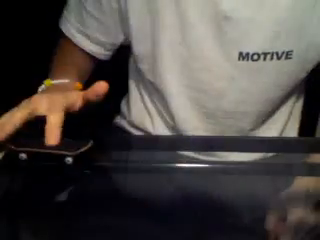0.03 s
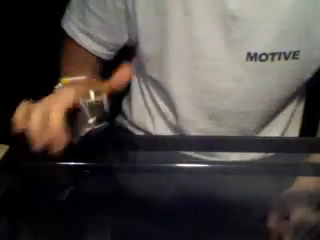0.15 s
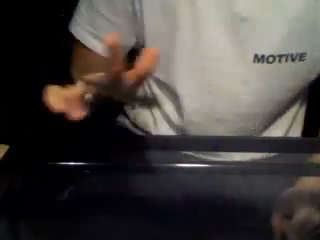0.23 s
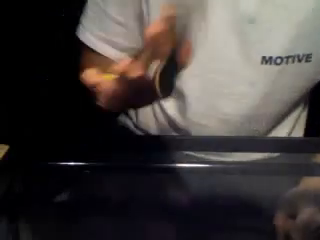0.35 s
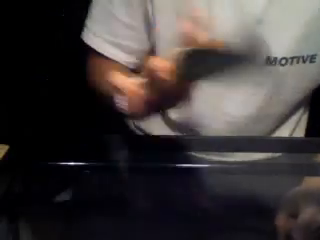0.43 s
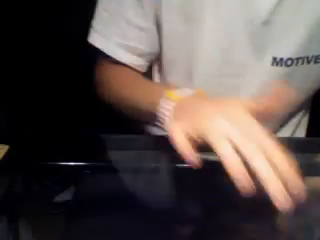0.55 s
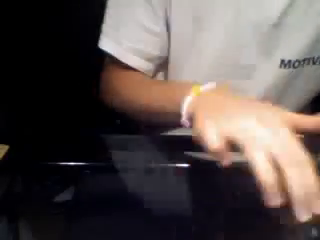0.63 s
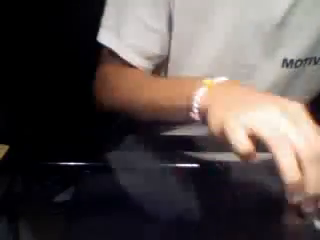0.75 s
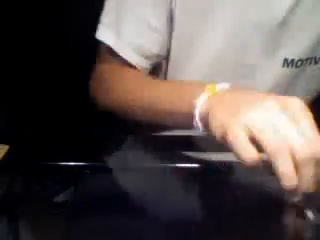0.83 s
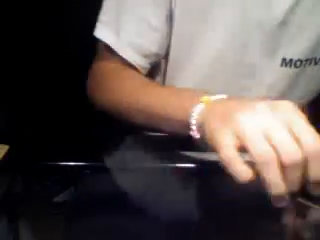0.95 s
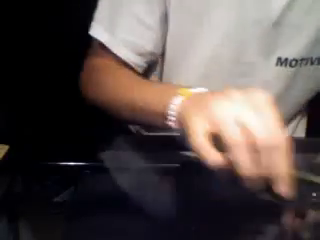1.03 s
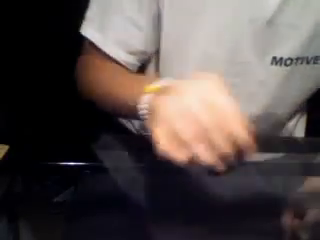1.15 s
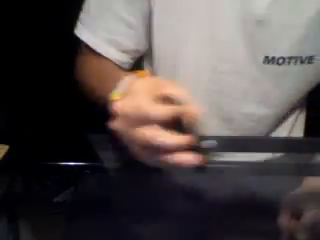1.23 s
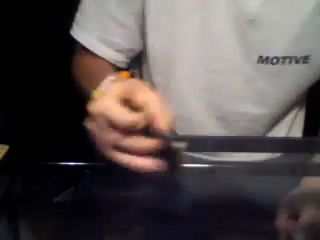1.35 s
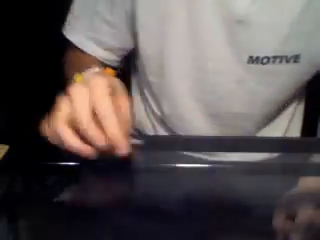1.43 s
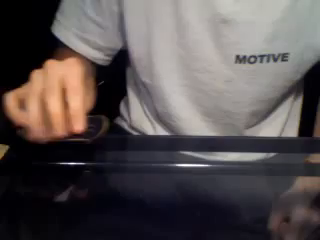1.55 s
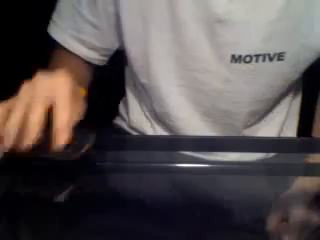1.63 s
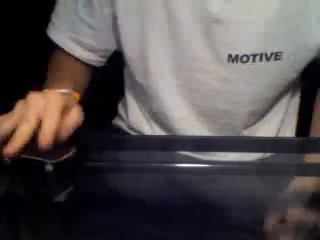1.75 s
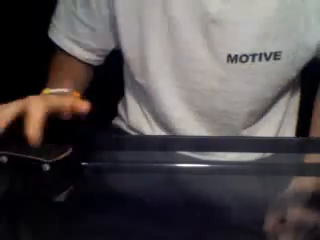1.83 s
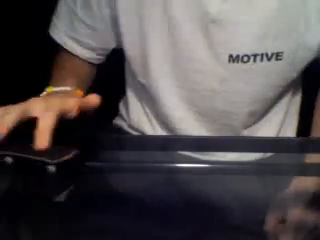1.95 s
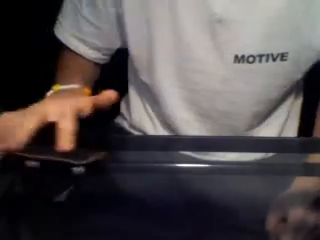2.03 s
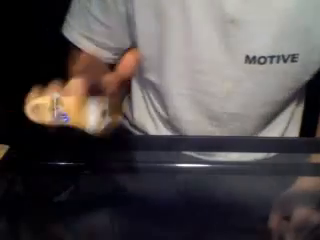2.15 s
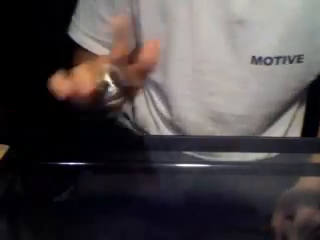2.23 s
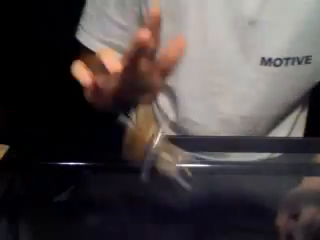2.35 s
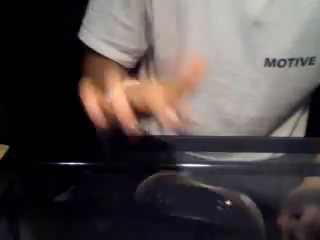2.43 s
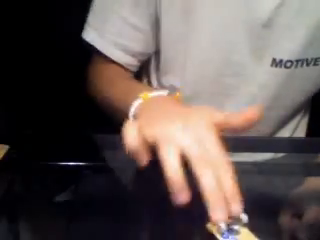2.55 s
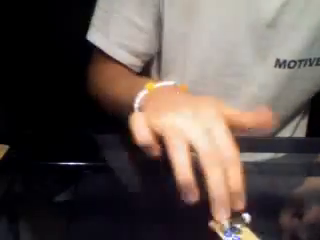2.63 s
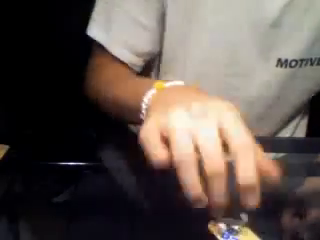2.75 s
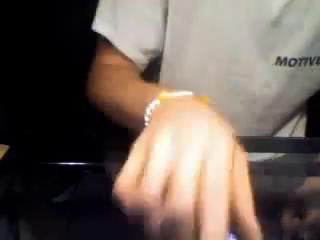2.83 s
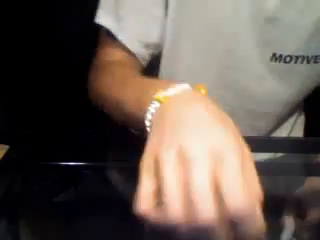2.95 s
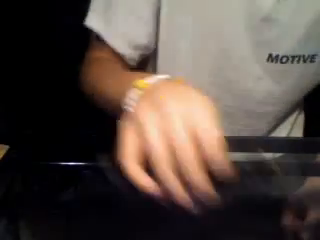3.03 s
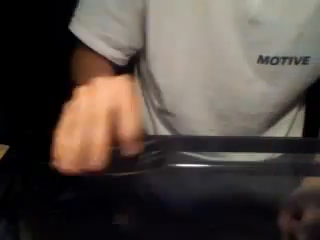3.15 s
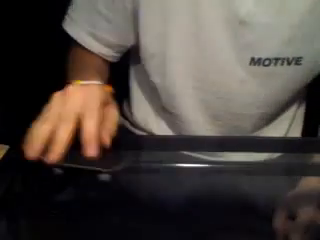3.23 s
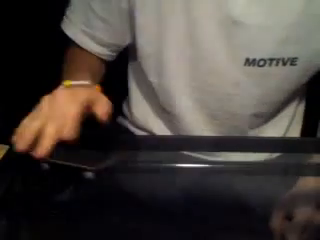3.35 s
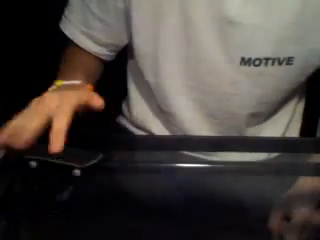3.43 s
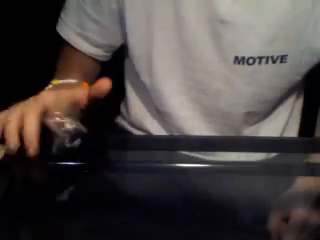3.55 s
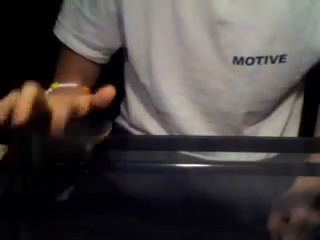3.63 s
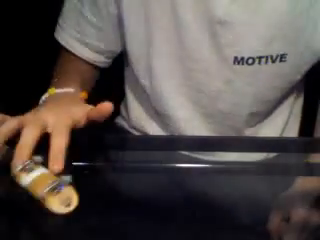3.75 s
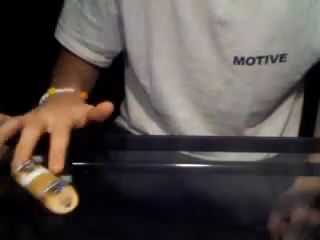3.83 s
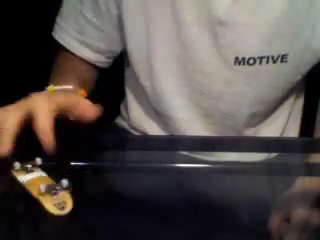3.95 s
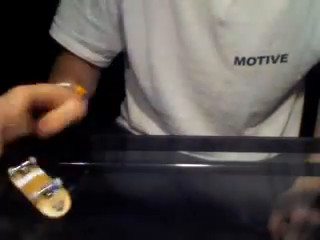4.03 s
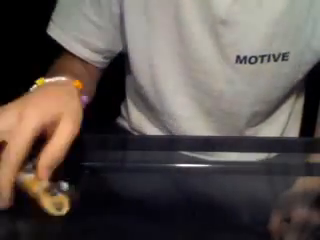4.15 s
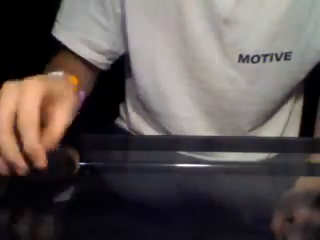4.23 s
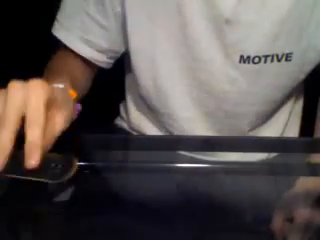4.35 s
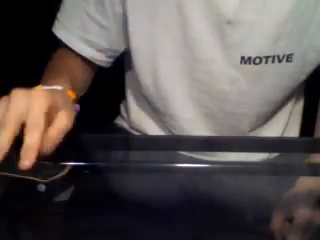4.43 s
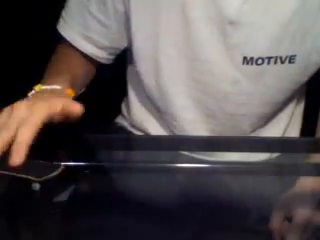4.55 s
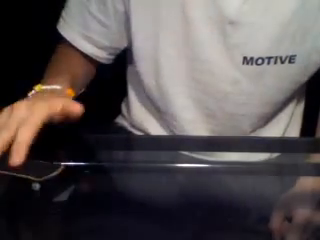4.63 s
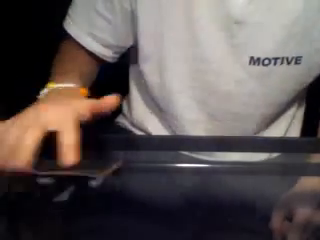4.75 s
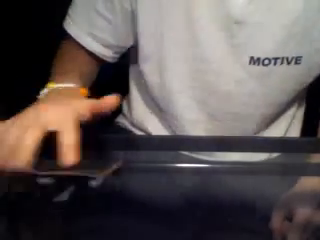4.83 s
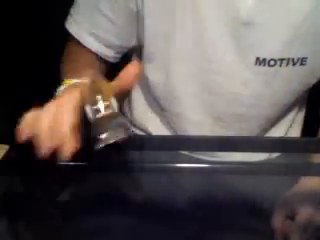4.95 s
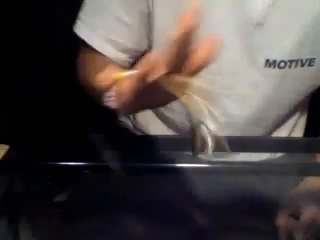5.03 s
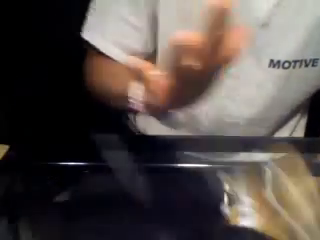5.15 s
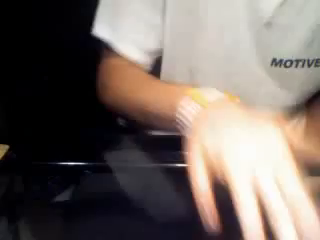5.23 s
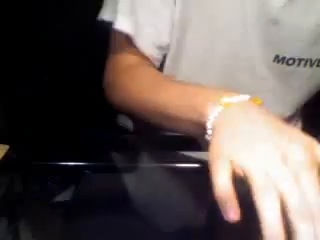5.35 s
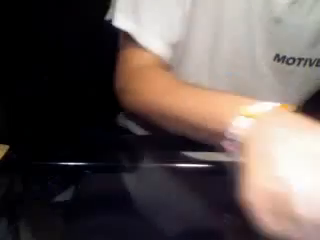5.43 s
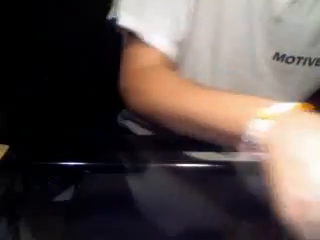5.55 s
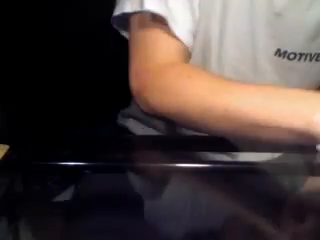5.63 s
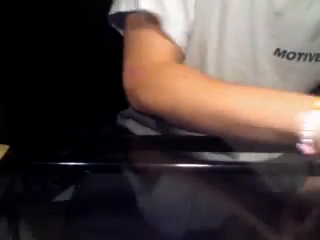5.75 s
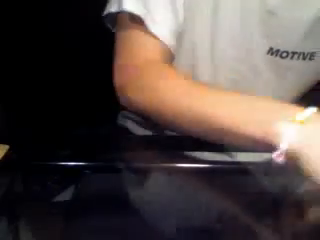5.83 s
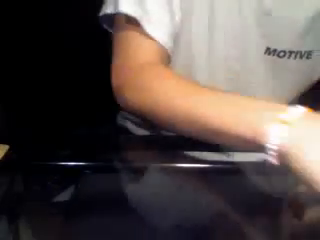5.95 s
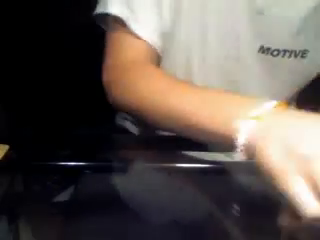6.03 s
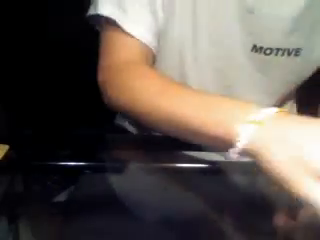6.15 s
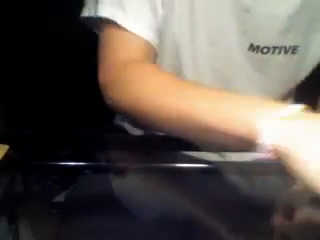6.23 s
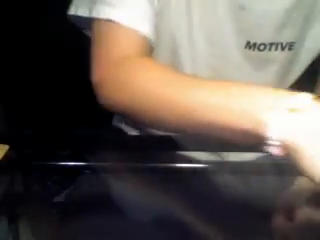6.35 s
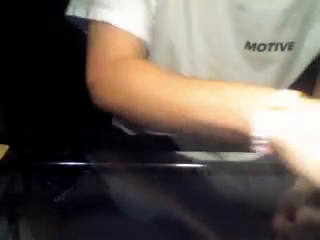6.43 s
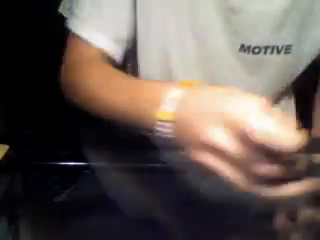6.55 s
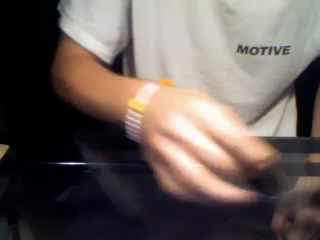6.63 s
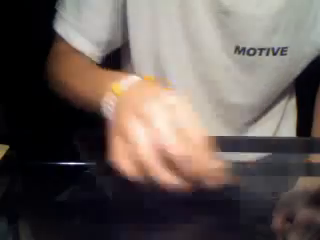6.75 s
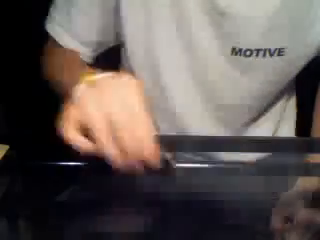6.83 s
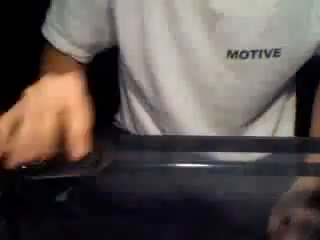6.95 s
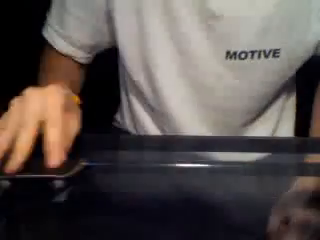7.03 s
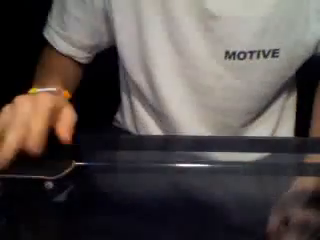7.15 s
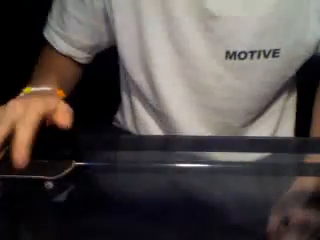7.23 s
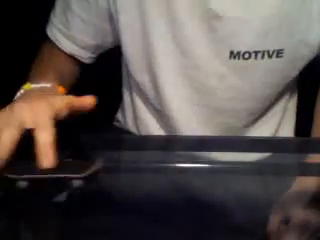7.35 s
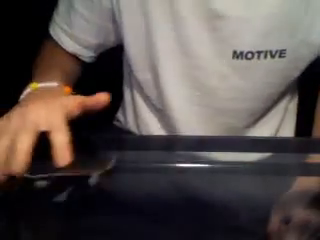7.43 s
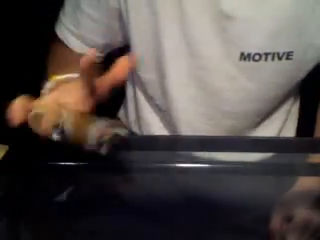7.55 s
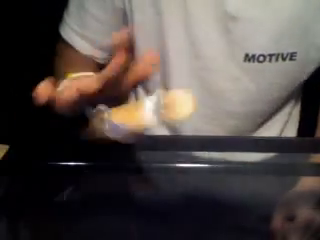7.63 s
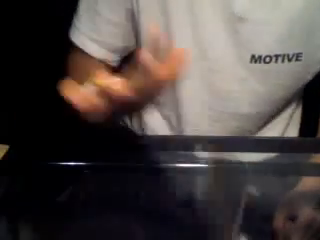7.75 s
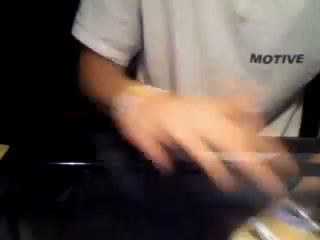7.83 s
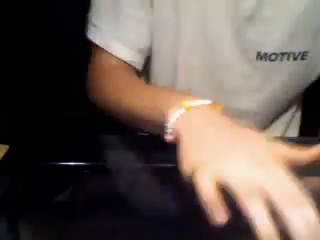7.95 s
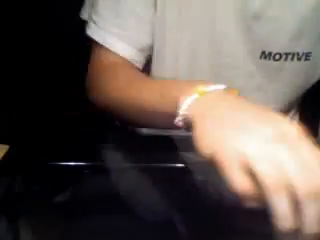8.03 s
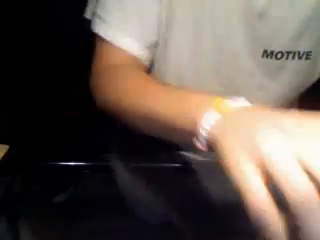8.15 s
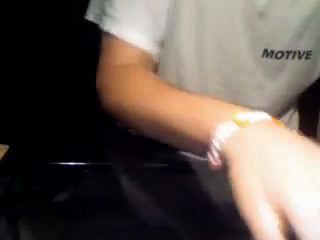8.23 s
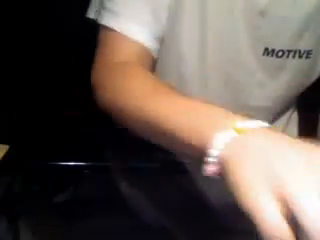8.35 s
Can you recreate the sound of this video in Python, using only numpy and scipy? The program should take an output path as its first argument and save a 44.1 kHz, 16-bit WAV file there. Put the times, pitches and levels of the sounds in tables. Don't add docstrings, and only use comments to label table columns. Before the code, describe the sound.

A miniature wooden skateboard snaps, flips and clatters on a glass table, sharp clicks and clacks between short rolling rumbles over a steady fan whine.

```python
import sys
import numpy as np
from scipy import signal
from scipy.fft import rfft, irfft
from scipy.io import wavfile
from scipy.ndimage import uniform_filter1d

SR = 44100
rng = np.random.default_rng(int(sys.argv[2]) if len(sys.argv) > 2 else 0)


def ratio_of_db(decibels):
    return 10 ** (np.asarray(decibels, float) / 20)


def transcribe(signal):
    frames = np.atleast_2d(signal).T
    limited = np.clip(frames, -1, 1)
    pcm = np.round(limited * 32767).astype(np.int16)
    wavfile.write(sys.argv[1], SR, pcm)


N = 369999


def rms_one(x):
    return x / np.sqrt(np.mean(x ** 2) + 1e-20)


def filtered(x, order, edge_hz, kind):
    return signal.sosfilt(signal.butter(order, edge_hz, kind, fs=SR, output="sos"), x)


def drift(rate_hz):
    pole = np.exp(-80 * np.pi * rate_hz / SR)
    slow = signal.lfilter([1], [1, -2 * pole, pole * pole], rng.standard_normal(N // 40 + 2002))[2000:]
    return np.interp(np.arange(N) / 40, np.arange(len(slow)), rms_one(slow - slow.mean()))


def sparse_grit(rate_hz):
    return (rng.random(N) < rate_hz / SR) * rng.standard_normal(N)


def ring(clicks, hz, t60_s):
    pole, w = ratio_of_db(-60 / (t60_s * SR)), 2 * np.pi * hz / SR
    return signal.lfilter([0, np.sin(w)], [1, -2 * pole * np.cos(w), pole * pole], clicks + 1e-18)


def resonance(x, hz, width_hz):
    pole = np.exp(-np.pi * width_hz / SR)
    feedback = [1, -2 * pole * np.cos(2 * np.pi * hz / SR), pole * pole]
    return signal.lfilter([(1 - pole * pole) / 2, 0, (pole * pole - 1) / 2], feedback, x)


def strike(modes, times_s, level_db, bursts, spread_db):
    delay_s = 0.0006
    starts = np.round((times_s + delay_s) * SR).astype(int)
    out, size = np.zeros((bursts.shape[1], N)), bursts.shape[2]
    luck = rng.standard_normal((len(times_s), len(modes)))
    for k, (hz, db, t60_s) in enumerate(modes):
        gains = ratio_of_db(level_db + db + spread_db * luck[:, k])
        force = np.zeros((len(out), N + size))
        for at, gain, burst in zip(starts, gains, bursts):
            force[:, at:at + size] += gain * burst
        out += (-1) ** k * ring(force[:, :N], hz, t60_s)
    return out


def damped(modes):
    return [(hz, db, min(t60_s, 17 / hz)) for hz, db, t60_s in modes]


# start_s, peak_db, metal_db, thud_db, drag_db
POPS = [
    (0.165, -19.5, -4, -37, -43.5),
    (2.129, -18.5, -2, -33, -45),
    (3.584, -22, 0.5, -41, -56),
    (4.846, -21, -3, -40.5, -42.5),
    (7.514, -19, -5.5, -39, -48.5),
]
# start_s, peak_db, wood_db, metal_db, thud_db
RATTLES = [(0.565, -4.5, -21.5, -13, -54), (0.574, -12.5, -14.5, -13, -42), (0.962, -17, -21, -17, -32),
           (1.424, -6.5, -15.5, -19.5, -30.5), (1.435, -10.5, -21, -19.5, -37.5),
           (1.674, -19.5, -19, -15, -50), (2.417, -8, -17, -11, -21.5), (2.517, -11, -25, -8, -25),
           (3.001, -19, -23, -13, -41.5), (3.226, -35, -4, -8, -51), (3.265, -17.5, -20, -19.5, -47.5),
           (3.729, -12, -16.5, -12, -41.5), (4.25, -16.5, -21.5, -12.5, -48),
           (4.386, -31, -10.5, -10, -45.5), (4.437, -16, -14.5, -17.5, -41.5),
           (5.328, -23.5, -14.5, -16.5, -39.5), (5.447, -24, -19, -12.5, -43),
           (6.756, -5.5, -19, -14.5, -33), (7.023, -27.5, -12.5, -8, -48),
           (7.052, -18.5, -16, -16.5, -43.5), (7.817, -5, -16.5, -16.5, -29),
           (7.899, -14.5, -25.5, -13.5, -30.5), (7.971, -23.5, -8.5, -8, -33),
           (8.311, -14, -17, -14, -29.5)]
# start_s, peak_db, wood_db, metal_db, thud_db
CLACKS = [(0.545, -3, -15.5, -15.5, -23.5), (0.567, -5.5, -21, -33, -24), (0.597, -12.5, -14, -6, -24.5),
          (0.627, -10, -25.5, -15, -29), (0.635, -10, -33, -28, -57), (1.706, -14, -21, -18.5, -41.5),
          (2.51, -9.5, -13.5, -9.5, -22), (3.205, -24.5, -10, -11, -41.5), (3.755, -14, -14.5, -18, -34.5),
          (3.787, -16.5, -22, -35, -47), (3.813, -24, -18.5, -12.5, -41), (3.843, -24, -26, -22.5, -42),
          (5.153, -10.5, -22.5, -11, -22), (5.176, -4.5, -18, -14, -22), (5.186, -7, -39, -16, -36),
          (5.246, -4.5, -18, -24.5, -22), (5.252, -13, -10, -8, -49), (5.261, -10, -30, -26.5, -33),
          (5.364, -30.5, -2.5, -8.5, -35.5), (7.012, -20.5, -9, -17.5, -49), (7.799, -6, -13, -20.5, -25),
          (7.887, -15.5, -22.5, -17, -25.5), (7.985, -23, -19, -10.5, -52), (8.048, -14.5, -25, -25, -50)]
# start_s, peak_db, wood_db, thud_db
TAPS = [(0.585, -18.5, -18, -39), (0.776, -34.5, -11, -72), (1.343, -28, -4.5, -47.5),
        (2.97, -31, -12.5, -44.5), (3.433, -41.5, -18.5, -56.5), (3.855, -29, -16.5, -60.5),
        (4.221, -40.5, -4.5, -51.5), (4.45, -28, -15.5, -49), (4.586, -42, -7.5, -79),
        (5.384, -23, -7.5, -52), (5.406, -19.5, -11, -33), (5.525, -25.5, -11, -39),
        (6.375, -24.5, -17.5, -46), (6.4, -20, -9, -37.5), (6.674, -20.5, -3.5, -35),
        (6.765, -20, -19, -57.5), (6.775, -20.5, -23, -55.5), (7.916, -27, -27.5, -44),
        (7.996, -25.5, -10.5, -44)]
# start_s, peak_db
TICKS = [
    (4.09, -52),
    (5.424, -48),
    (5.572, -46.5),
    (8.015, -47),
]


def contacts():
    rows = []
    for s, db, metal, thud, _ in POPS:
        for lag_s, loss_db in [(0, 0), (0.013, -34)]:
            rows.append((s + lag_s, db + loss_db, -14.5, metal, metal - 3, thud, 2.2))
    rest = [(*row, 6.0) for row in RATTLES] + [(*row, 3.0) for row in CLACKS]
    rest += [(s, db, wood, -26, thud, 3.6) for s, db, wood, thud in TAPS]
    rest += [(s, db, -28, -4, -77, 3.0) for s, db in TICKS]
    rows += [(s, db, wood, metal, metal, thud, ms) for s, db, wood, metal, thud, ms in rest]
    return np.transpose(rows)


# pitch_hz, level_db, t60_s
DECK = [(607.6, -3, 0.038), (778, -2, 0.06), (998, -2.5, 0.053), (1095, -1, 0.045), (1324, 8.5, 0.0049),
        (1577, 1.5, 0.036), (1867, -1, 0.036)]
# pitch_hz, level_db, t60_s
TRUCKS = [(2336, -8, 0.005), (3010, -6.5, 0.0022), (2784, -7.5, 0.0085), (3448, -3, 0.0071),
          (3783, -1, 0.0093), (4580, 0.5, 0.0017)]
# pitch_hz, level_db, t60_s
WHEELS = [(5560, -5.5, 0.009), (5447, 1.5, 0.0089), (6560, -3.5, 0.0067)]
# pitch_hz, level_db, t60_s
NUTS = [(7235, -2, 0.006), (7920, -0.5, 0.006), (8976, 2, .002), (8900, -5, 0.003), (10670, -9, 0.0017)]


def board():
    s, peak_db, wood_db, wheel_db, nut_db, _, chatter_ms = contacts()
    ms = np.arange(1000) * 1000 / SR
    draws = rng.random((len(s), 2, len(ms)))
    rattle = (draws[:, 0] < 7000 / SR) * (2 * draws[:, 1] - 1)
    bursts = np.zeros((len(s), 2, len(ms)))
    bursts[:, 0] = ratio_of_db(-3) * rattle * np.exp(-ms / chatter_ms[:, None])
    bursts[:, 0, 0] = 1
    bursts[:, 1, 0] = np.linalg.norm(bursts[:, 0], axis=1)
    parts = strike(damped(DECK[2:]), s, peak_db + wood_db - 0.5, bursts, spread_db=2.5)
    parts += strike(damped(TRUCKS), s, peak_db - 6, bursts, spread_db=2.5)
    parts += strike(damped(WHEELS), s, peak_db + wheel_db + 4, bursts, spread_db=2.5)
    parts += strike(damped(NUTS), s, peak_db + nut_db + 8, bursts, spread_db=2.5)
    return filtered(parts, 2, 500, "high")


# pitch_hz, level_db, t60_s
TABLE = [(168.7, -8, 0.054), (234.8, -4.5, 0.046), (288.4, -3.5, 0.076), (338.7, -2, 0.1),
         (433, -3.5, 0.054), (558, -6, 0.033)]
# pitch_hz, level_db, t60_s
FRAME = [(36, -2, 0.012), (89.2, -3.5, 0.017)]
# start_s, hollow_db, hollow_hz, puff_db, frame_db
SLAMS = [
    (1.435, -51, 1003, -56, -57),
    (2.418, -17.5, 693, -32.5, -54),
    (2.514, -40, 903, -25, -24),
    (3.755, -24.5, 792, -44.5, -73),
    (4.252, -24, 953, -48, -58),
    (6.756, -15.5, 840, -8, -37),
    (7.024, -30.5, 812, -51.5, -55),
    (8.049, -18, 790, -57, -79),
]


def bumps():
    s, peak_db, wood_db, _, _, thud_db, _ = contacts()
    slam_s, hollow_db, hollow_hz, puff_db, slam_db = np.transpose(SLAMS)
    push = np.tile(np.hanning(30) / 15, (len(s) + len(slam_s), 1, 1))
    table = strike(TABLE, s, thud_db - 6.5, push, spread_db=2.5)
    flex_db = peak_db - 14 + 0.27 * wood_db
    deck = strike(damped(DECK[:2]), s, flex_db, push, spread_db=0.5)
    hollow = 0
    for at, db, hz in zip(slam_s, hollow_db, hollow_hz):
        hollow = hollow + strike([(hz, db, 0.021)], np.array([at]), np.zeros(1), push, spread_db=2.5)
    puff = strike([(390, 0, 0.0078)], slam_s, puff_db, push, spread_db=0)
    frame_db = np.r_[thud_db - 19, slam_db] + 7.5
    frame = strike(FRAME, np.r_[s, slam_s], frame_db, push, spread_db=0)
    trapped_air = signal.lfilter([1, -1], [1, -.96], hollow) - puff
    return filtered(table + deck, 2, 110, "high") + frame + trapped_air * [[1], [.3]]


# start_s, end_s, rumble_db
ROLLS = [
    (.045, .16, -62),
    (1.95, 2.12, -61),
    (3.42, 3.47, -60),
    (4.67, 4.84, -56),
    (7.33, 7.51, -56.5),
]
# pitch_hz, width_hz, level_db
ROLL_MODES = [(664, 150, 10), (790, 43, 8), (900, 450, 8), (1240, 180, -69)]


def rolling():
    rise_s, fall_s, swell_db, brighten_db = 0.021, 0.012, -6.5, -2
    t, level, progress = np.arange(N) / SR, np.zeros(N), np.zeros(N)
    for start, end, db in ROLLS:
        along = np.clip((t - start) / (end - start), 0, 1)
        progress += along * (t < end)
        fade = np.clip(np.minimum((t - start) / rise_s, (end - t) / fall_s), 0, 1)
        level += ratio_of_db(db + swell_db * along) * fade
    grit = sparse_grit(2500) * ratio_of_db(drift(30))
    rumble = rms_one(sum(ratio_of_db(db) * resonance(grit, hz, width_hz) for hz, width_hz, db in ROLL_MODES))
    scrape = rms_one(resonance(grit, 1500, 1400))
    return level * (rumble + ratio_of_db(-27 + brighten_db * progress) * scrape)


def drags():
    t, growth_s = np.arange(N) / SR, 0.019
    level = sum(ratio_of_db(db) * np.exp(np.minimum(t - s, 0) / growth_s) * (t < s) for s, *_, db in POPS)
    grit = sparse_grit(5000)
    return level * rms_one(resonance(grit, 1500, 1000) + ratio_of_db(-8) * resonance(grit, 2800, 1500))


# start_s, level_db, pitch_hz, length_s
WRIST = [
    (0.85, -55.5, 326, 0.067),
    (2.876, -50, 146, 0.014),
    (4.157, -56, 277, 0.023),
    (5.85, -49, 239, 0.026),
    (6.163, -59.5, 298, 0.018),
    (6.298, -58, 320, .03),
]


def wrist():
    t, noise, out = np.arange(N) / SR, rng.standard_normal(N), 0
    for s, db, hz, length_s in WRIST:
        along = np.clip((t - s) / length_s, 0, 20)
        hum = rms_one(resonance(noise, hz, 0.59 * hz))
        out = out + ratio_of_db(db) * hum * np.minimum(along / .15, 1) * np.exp(-along)
    return out


# centre_hz, t60_s, level_db
ROOM = [(184, 0.17, -10), (494, 0.32, -17.5), (1395, .13, -13.5), (3530, 0.29, -16), (5380, 0.27, -14.5),
        (8840, .22, -10)]


def room(x):
    t, tail = np.arange(SR // 2) / SR, 0
    centres_hz = np.array(ROOM)[:, 0]
    edges_hz = [60, *np.sqrt(centres_hz[1:] * centres_hz[:-1]), 12000]
    for (_, t60_s, db), low_hz, high_hz in zip(ROOM, edges_hz, edges_hz[1:]):
        band = filtered(rng.standard_normal(len(t)), 2, [low_hz, high_hz], "band")
        shape = ratio_of_db(-60 * t / t60_s) * np.clip(t / 0.018, 0, 1)
        tail = tail + ratio_of_db(db) * band * shape / np.sqrt(np.sum(shape ** 2))
    return signal.fftconvolve(x, tail)[:N]


def coloured(points, size):
    hz, db = np.transpose(points)
    bins_hz = np.maximum(np.fft.rfftfreq(size, 1 / SR), 1)
    gain = ratio_of_db(np.interp(np.log(bins_hz), np.log(hz), db))
    return rms_one(irfft(rfft(rng.standard_normal(size)) * gain, size))


# freq_hz, level_db (per Hz)
FAN = [(18, -35.5), (30, -21.5), (102, -14.5), (287, -2), (600, -16), (730, -8), (1160, -5), (1320, -2),
       (2260, -6), (2550, -5.5), (3690, -6), (3970, -10.5), (4270, -10.5), (8930, -23.5), (10600, -37),
       (13800, -62), (22000, -120)]
# pitch_hz, rms_db
WHINE = [(1298, -68), (2600, -73), (3898, -71)]


def fan():
    turns_s = np.cumsum(1 + 0.00089 * drift(3.4)) / SR
    tones = 0
    for hz, db in WHINE:
        tones = tones + ratio_of_db(db + 1.5 * drift(2.6)) * np.sqrt(2) * np.sin(2 * np.pi * hz * turns_s)
    return ratio_of_db(-58.02 + 0.3 * drift(2.5)) * coloured(FAN, N) + tones


def scene():
    direct, radiated = board() + bumps() + rolling() + drags() + wrist()
    return (direct + ratio_of_db(3.5) * room(radiated) + fan())[None]


def webcam_blocks(x):
    block, block_start = 256, 386
    step_low_db, step_high_db, fill_db = -9, 1, -20
    offset = .42
    n, k = np.arange(2 * block)[:, None], np.arange(block)
    window = np.sin(np.pi * (n + .5) / (2 * block))
    basis = window * np.cos(np.pi / block * (n + .5 + block / 2) * (k + .5)) * np.sqrt(2 / block)
    lead, count = 2 * block - block_start, 2 * (N // (2 * block) + 2)
    halves = np.pad(x, (lead, (count + 1) * block - lead - N)).reshape(-1, block)
    lines = np.hstack([halves[:-1], halves[1:]]) @ basis
    pair_power = np.repeat((lines[::2] ** 2 + lines[1::2] ** 2) / 2, 2, axis=0)
    band_level = np.sqrt(uniform_filter1d(pair_power, size=7, axis=1) + 1e-20)
    step = ratio_of_db(np.interp(k, [0, block / 4], [step_low_db, step_high_db])) * band_level
    fill = ratio_of_db(fill_db) * rng.standard_normal(lines.shape)
    coarse = step * (np.round(lines / step - offset) + offset + fill)
    blocks = coarse @ basis.T
    halves = np.vstack([blocks[:1, :block], blocks[1:, :block] + blocks[:-1, block:]])
    return halves.ravel()[lead:lead + N]


def band_limit(x):
    return signal.sosfilt(signal.butter(12, 12680, fs=SR, output="sos"), x)


def record(dry):
    overload, edge_hz, image_top_hz, image_db = 0.7, 10626, 11650, -10.5
    rounded = overload * np.tanh(dry[0] / overload)
    low_pass = signal.ellip(10, .5, 60, edge_hz, fs=SR, output="sos")
    cut = signal.sosfilt(low_pass, webcam_blocks(rounded))
    mirror = cut * (-1) ** np.arange(N)
    image = filtered(mirror, 16, image_top_hz, "low")
    mix = (cut + ratio_of_db(image_db) * image)[None]
    return band_limit(mix)


dry = scene()
out = record(dry)
transcribe(out)
```